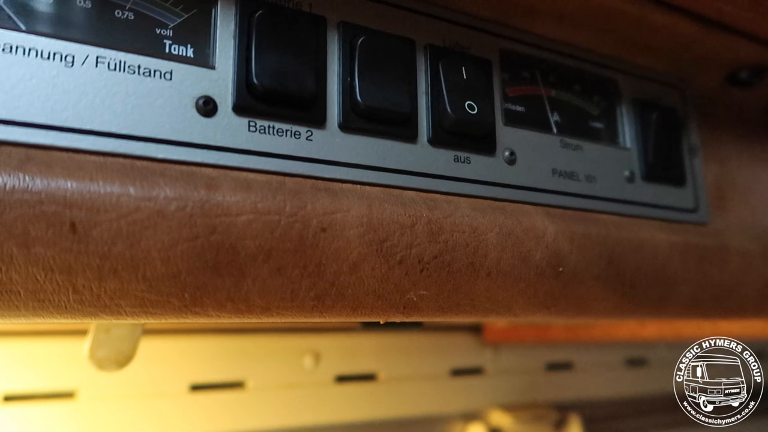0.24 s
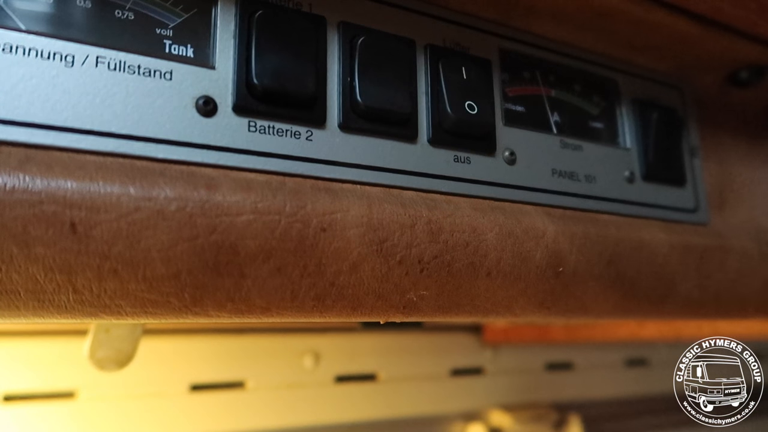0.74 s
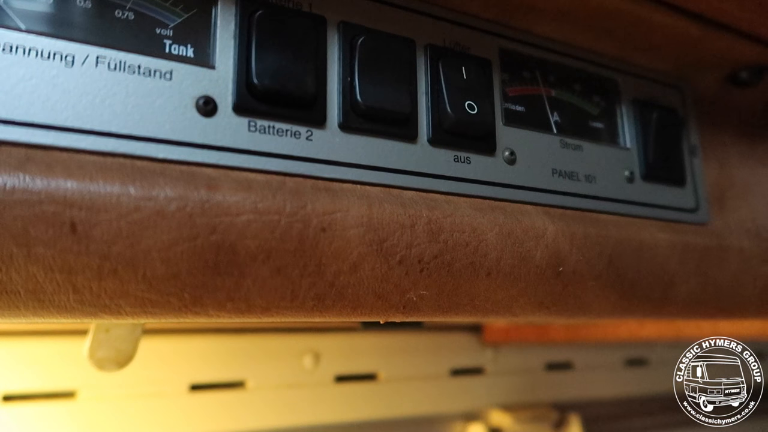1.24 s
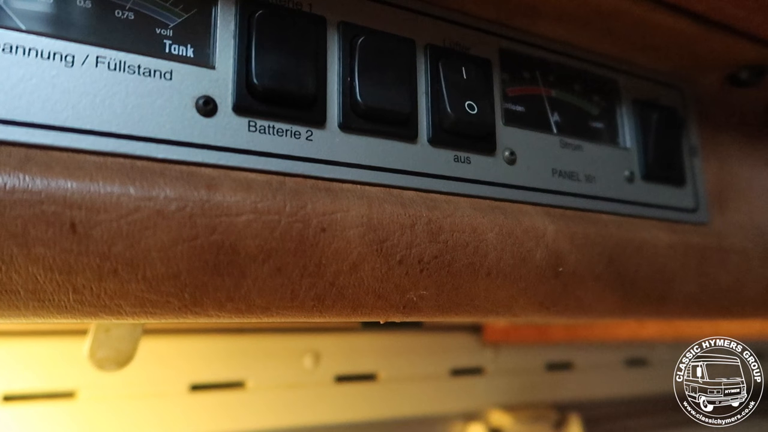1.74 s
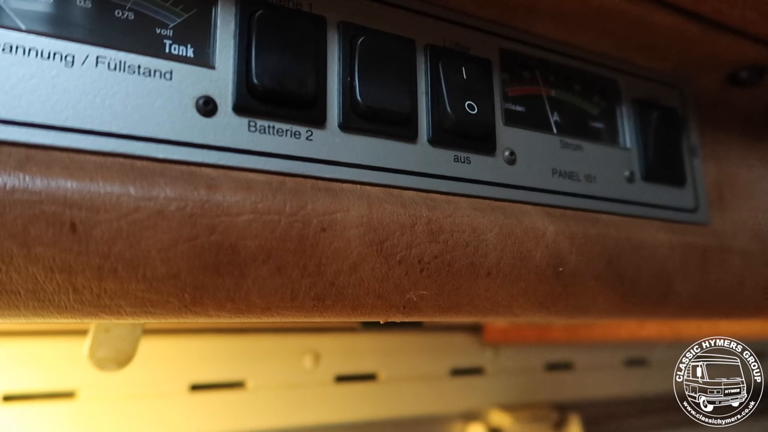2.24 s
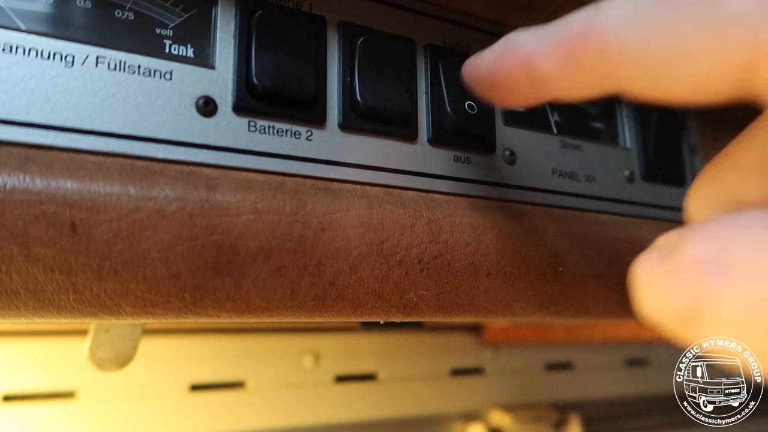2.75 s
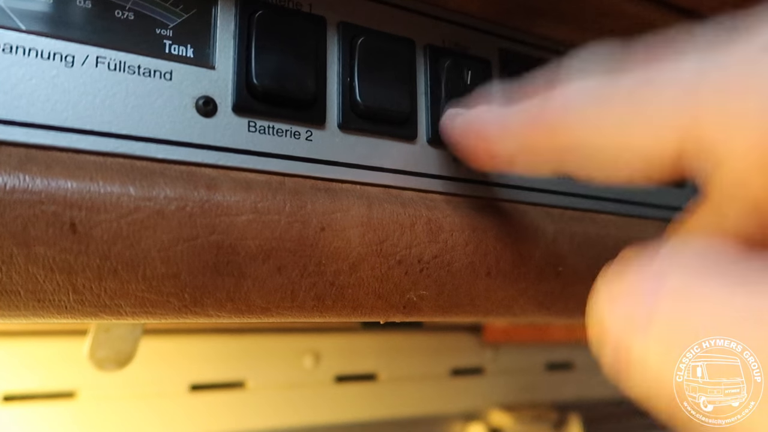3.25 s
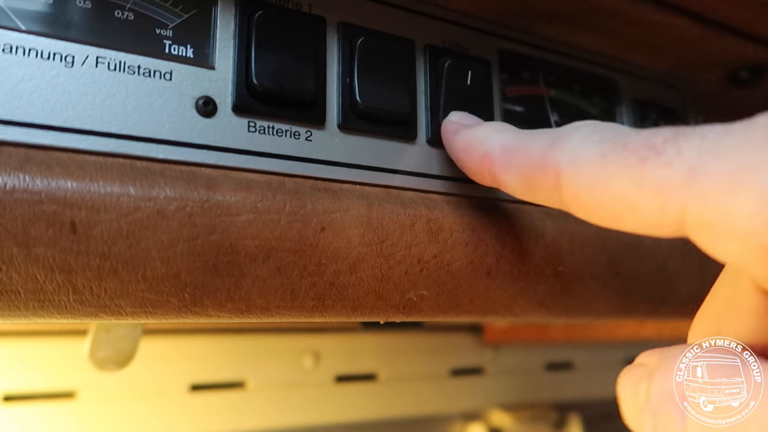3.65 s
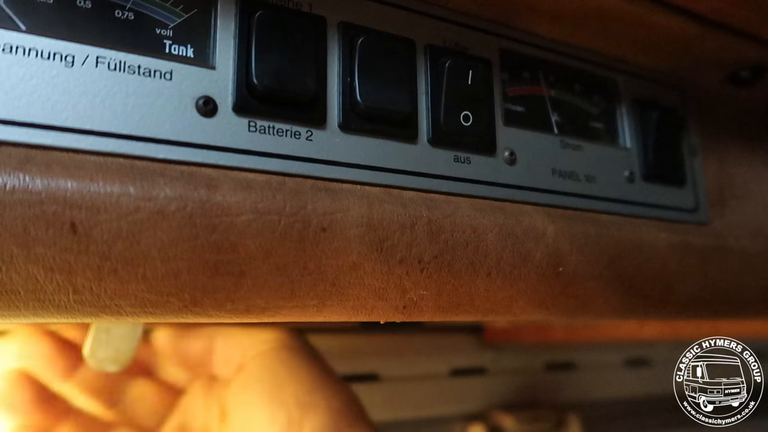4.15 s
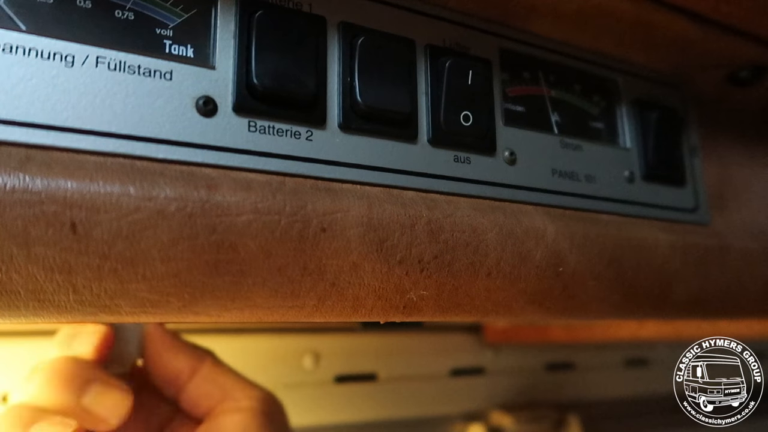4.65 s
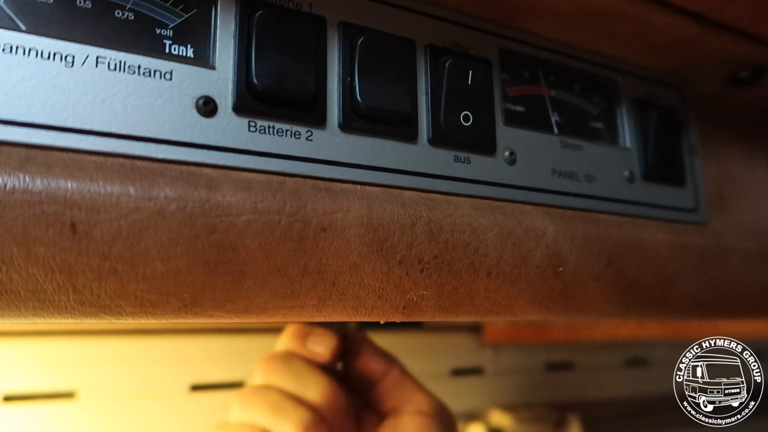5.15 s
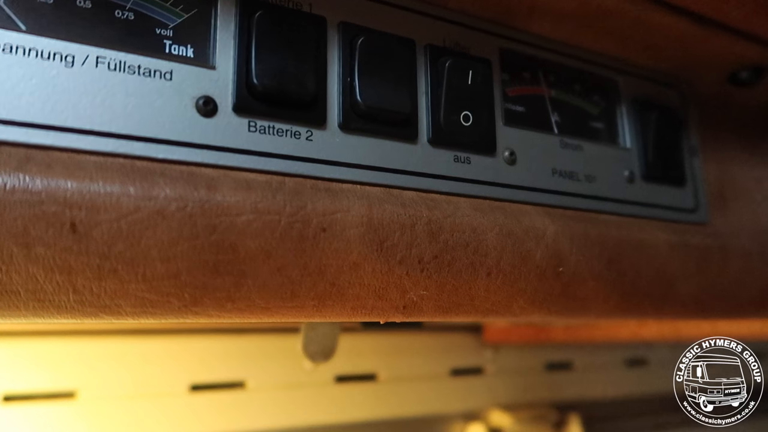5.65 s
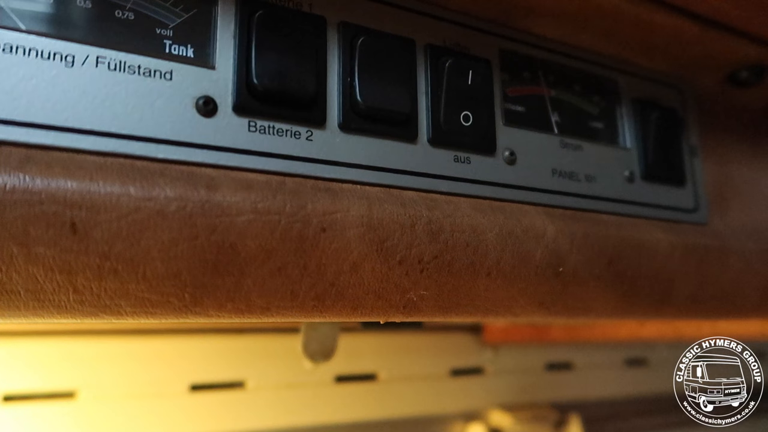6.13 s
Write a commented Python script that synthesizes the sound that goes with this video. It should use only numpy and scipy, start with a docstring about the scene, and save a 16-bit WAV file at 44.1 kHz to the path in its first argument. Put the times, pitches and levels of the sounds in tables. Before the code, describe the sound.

A small fan runs with an even, airy hum in a camper cabin until a nearby switch snaps loudly and the hum sinks in pitch and dies away. After a soft release click, fingers rub and tap a plastic vent tab, drag it with a short scrape and hit the end stop with a knock. A few small ticks follow. The sound is close and dry, with faint rumble and hiss underneath.

```python
"""Extractor fan and vent slider in a caravan

A small fan hums, with tones at multiples of its shaft speed over turbulent air, until a finger snaps
a rocker switch and the rotor coasts down. The finger peels off the switch. A hand takes the tab of a
plastic vent slider, drags it to the end stop and lets go: impacts ring the modes of the plastic,
friction scrapes and squeaks. A low cabin rumble, a thin hum and a faint hiss lie below."""
import sys
import numpy as np
from scipy import signal
from scipy.fft import rfft, irfft
from scipy.io import wavfile

SR = 44100
rng = np.random.default_rng(int(sys.argv[2]) if len(sys.argv) > 2 else 0)


def master(y):
    """Save y as 16-bit WAV."""
    cut = np.clip(np.atleast_2d(y).T, -1, 1)
    pcm = np.round(cut * 32767)  # scale
    wavfile.write(sys.argv[1], SR, pcm.astype(np.int16))


N = 281799
TIME = np.arange(N) / SR
HZ = np.maximum(np.fft.rfftfreq(N, 1 / SR), 1)

# Stereo width of the fan. Each row: frequency in Hz, side minus mid in dB.
FAN_WIDTH = [(60, -58), (110, -59), (200, -31.5), (380, -21), (700, -42), (1290, -18.5), (2380, -17.5),
             (4390, -5), (8100, -1), (15000, 16)]
# Stereo width of nearby sources, before any trim. Each row: frequency in Hz, side minus mid in dB.
NEAR_WIDTH = [(60, -53.5), (130, -33), (290, -24.5), (640, -25), (1410, -17.5), (3090, -11.5), (6800, -0.5),
              (15000, 5.5)]


def amp(db):
    """Amplitude ratio: a factor of ten for every 20 dB."""
    return 10 ** (np.asarray(db) / 20)


def unit_rms(x):
    """Normalisation to unit mean power."""
    return x / np.sqrt(np.mean(x ** 2) + 1e-20)


def spectrum_db(points):
    """Spectral envelope: (Hz, dB) points interpolated over log frequency at every bin."""
    hz, db = np.transpose(points)
    return np.interp(np.log(HZ), np.log(hz), db)


def resonance(hz, width_hz, at_hz=HZ):
    """Magnitude response of a damped resonator, 1 at its centre, with the given half-power width."""
    return 1 / np.sqrt(1 + (2 * (at_hz - hz) / width_hz) ** 2)


def peaks_db(rows):
    """Lorentzian peaks and dips, summed in dB at every bin."""
    return sum(db * resonance(hz, width) ** 2 for hz, width, db in rows)


def drift(rate):
    """Low-pass random fluctuation of unit spread, changing about rate times a second."""
    step, settle = 40, 2000
    pole = np.exp(-2 * np.pi * rate * step / SR)
    noise = rng.standard_normal(N // step + settle + 2)
    slow = signal.lfilter([1], [1, -2 * pole, pole ** 2], noise)[settle:]
    return np.interp(np.arange(N) / step, np.arange(len(slow)), unit_rms(slow))


def swell_db(start, rise_s, hold_s, fade_s):
    """Exponential envelope in dB: gains 20 per rise_s up to 0 at start, holds, loses 20 per fade_s."""
    rising = (start - TIME) / rise_s
    fading = (TIME - start - hold_s) / fade_s
    return -20 * np.maximum(np.maximum(rising, fading), 0)


def stereo_noise(colour_db, width):
    """Partly coherent noise of unit rms: independent mid and side signals share one colour."""
    mid, side = rfft(rng.standard_normal((2, N)))
    side = amp(spectrum_db(width)) * side * [[1], [-1]]
    return unit_rms(irfft(amp(colour_db) * (mid + side), N))


def spread(x, width, trim_db=0, lag_s=.0006):
    """Mid-side stereo: a delayed, filtered copy adds on the left and subtracts on the right."""
    delay = np.exp(-2j * np.pi * HZ * lag_s)
    side = irfft(rfft(x) * delay * amp(spectrum_db(width) + trim_db), N)
    return x + side * [[1], [-1]]


def air_stream(colour_db, halvings, drive_lost):
    """Turbulence noise filtered by the housing; each halving of speed leaves it weaker and duller."""
    db_per_halving, treble_db_per_halving, treble_hz = -27, -12.5, 1300
    air = stereo_noise(colour_db, FAN_WIDTH)
    duct_band = irfft(rfft(air) * resonance(890, width_hz=140) ** 2, N)
    air = air + (amp(2 * drift(rate=3)) - 1) * duct_band   # one duct resonance swells unevenly
    bass = signal.sosfiltfilt(signal.butter(2, treble_hz, fs=SR, output="sos"), air)
    treble_db = treble_db_per_halving * halvings - drive_lost
    level_db = -32 - 5.5 * drive_lost + db_per_halving * halvings + .27 * drift(rate=.73)
    return amp(level_db) * (bass + amp(treble_db) * (air - bass))


def rotor_tones(colour_db, turns_per_s, coasting_s, drive_lost):
    """Harmonics of the shaft rate glide down with it, swelling as they cross fixed resonances."""
    # Every fourth order is a blade-rate harmonic. Each row: multiple of the shaft rate, level in dB.
    orders = [(1, -41), (2, -64.5), (3, -66), (4, -39.5), (5, -53.5), (6, -53), (7, -62.5), (8, -42.5),
              (9, -63), (10, -61), (12, -37.5), (13, -71), (15, -64), (16, -52), (20, -56), (23, -71),
              (32, -63.5), (34, -60), (38, -67.5), (51, -67.5), (52, -68.5), (54, -70), (55, -71),
              (58, -77), (60, -79.5), (83, -67.5), (89, -83)]
    # Orders that outlast the motor current. Each entry: multiple, level change in dB when coasting.
    coasting_db = {5: -6, 6: -8, 7: 2, 8: -5, 9: 11, 10: 13, 12: -12, 13: 14, 15: 8, 16: -3}
    driven_drop_db = -18   # all other orders
    fade_below_turns_per_s, fade_db_per_turn_per_s = 42.7, 8
    unsteady = 1 + .0008 * drift(rate=5) + .012 * (coasting_s > 0) * drift(rate=40)
    shaft_angle = 2 * np.pi * np.cumsum(turns_per_s * unsteady) / SR
    waver_db = [1.3 * drift(rate=5) for _ in range(4)]
    flicker_db = [4 * drift(rate=22) for _ in range(6)]
    phases = rng.uniform(0, 2 * np.pi, len(orders))
    unpowered = np.clip(coasting_s / .024, 0, 1)
    tones = np.zeros(N)
    for i, (order, db) in enumerate(orders):
        hz = order * turns_per_s
        housing_db = .3 * (np.interp(hz, HZ, colour_db) - np.interp(hz[0], HZ, colour_db))
        panel_db = 14 * resonance(375, width_hz=100, at_hz=hz) ** 2
        change_db = flicker_db[i % 6] + housing_db + panel_db + coasting_db.get(order, driven_drop_db)
        level_db = db + waver_db[i % 4] + unpowered * change_db
        tones += amp(level_db) * np.sin(order * shaft_angle + phases[i])
    slow_loss_db = fade_db_per_turn_per_s * np.maximum(fade_below_turns_per_s - turns_per_s, 0)
    return spread(np.sqrt(2) * amp(-15 * drive_lost - slow_loss_db) * tones, FAN_WIDTH)


def fan():
    """A rotor radiates broadband noise and tones; without power its speed decays exponentially."""
    # Spectrum of the air stream. Each row: frequency in Hz, relative level in dB.
    turbulence = [(12, -38.5), (20, -12), (80, -4.5), (290, -2), (400, -7.5), (1000, -7), (1300, -13.5),
                  (2000, -14.5), (5000, -31), (10700, -38.5), (12800, -48), (14500, -69)]
    # Housing and duct resonances, and the gaps between. Each row: centre in Hz, width in Hz, gain in dB.
    housing = [(90, 47, 7), (151, 60, 6), (489.4, 63, 10.5), (646, 90, 8), (797.5, 15, 5.5), (870, 71, 9),
               (996, 390, 5.5), (1394, 80, 10.5), (1557, 130, 7), (2319, 200, 11), (2335, 16, 9.5),
               (3090, 120, 10), (2670, 150, 9), (3380, 88, 5.5), (3705, 260, 11), (3948, 63, 9),
               (4250, 60, 10.5), (4590, 68, 10.5), (4895, 270, 8.5), (6000, 56, 1.5), (5780, 140, 8),
               (6930, 100, 7), (7465, 140, 6)]
    gaps = [(195, 25, -4), (310, 40, -5), (390, 50, -6), (550, 40, -4), (725, 40, -7), (1260, 60, -10),
            (1645, 30, -6), (1870, 50, -7), (2210, 50, -9), (2470, 60, -3), (3070, 50, -8), (3520, 90, -7),
            (3850, 70, -5), (4180, 80, -4), (5360, 60, -4)]
    running_turns_per_s, power_off_s, coast_decay_s = 84.45, 3.315, .59
    coasting_s = np.maximum(TIME - power_off_s, 0)
    turns_per_s = running_turns_per_s * np.exp(-coasting_s / coast_decay_s)
    halvings = np.log2(running_turns_per_s / turns_per_s)
    drive_lost = 1 - np.exp(-coasting_s / .028)
    colour_db = spectrum_db(turbulence) + peaks_db(housing + gaps)
    air = air_stream(colour_db, halvings, drive_lost)
    return air + rotor_tones(colour_db, turns_per_s, coasting_s, drive_lost)


def cabin():
    """Ambient noise floor: a shifting rumble, a pure hum that dies away late, and a steady hiss."""
    # Course of the rumble. Each row: time in seconds, level in dB.
    rumble_course = [(3.3, -51.5), (3.9, -49), (4.3, -43.5), (4.7, -43.5), (5.3, -44), (5.7, -48.5),
                     (6.39, -47)]
    # Spectrum of the rumble. Each row: frequency in Hz, relative level in dB.
    rumble_spectrum = [(12, -37), (20, -13), (59, -0.5), (140, -7), (220, -7), (280, -4), (350, -16.5),
                       (410, -12), (500, -19.5), (800, -30), (1500, -58)]
    # Two faint hums in the rumble and a gap above them. Each row: centre in Hz, width in Hz, gain in dB.
    rumble_peaks = [(217.5, 20, 4), (283, 16, 5), (315, 24, -8)]
    # Stereo width of the cabin noise. Each row: frequency in Hz, side minus mid in dB.
    width = [(25, -55.5), (60, -41.5), (150, -26), (380, -7.5), (950, -2.5), (2380, -1), (5960, -1),
             (15000, 4)]
    hum_hz, hum_ends_s, hiss_db = 219.3, 5.2, -57.5
    rumble_db = np.interp(TIME, *np.transpose(rumble_course)) + .6 * drift(rate=5)
    rumble = amp(rumble_db) * stereo_noise(spectrum_db(rumble_spectrum) + peaks_db(rumble_peaks), width)
    hum_db = -56.5 + swell_db(0, 1, hold_s=hum_ends_s, fade_s=.3) + 2 * drift(rate=3)
    hum = amp(hum_db) * np.sqrt(2) * np.sin(2 * np.pi * hum_hz * TIME)
    hiss_colour = spectrum_db([(200, -3.5), (600, -1.5), (1500, -6), (2500, -10), (6000, -17.5),
                               (11700, -28), (15400, -36)])
    return rumble + hum + amp(hiss_db) * stereo_noise(hiss_colour, width)


def strike(contacts, modes, trim_db, crack_db, rise_s):
    """Modal impact: each contact excites damped sinusoids and a noise crack, low-passed at its cutoff."""
    out = np.zeros(N)
    t = TIME[:SR // 4]
    scatter_db = rng.normal(0, 2, (len(contacts), len(modes)))
    noise = signal.lfilter([1, -1], [1, -.9], rng.standard_normal((len(contacts), len(t))))
    cracks = noise * amp(crack_db - 60 * t / .006)
    attack = 1 - np.exp(-t / rise_s)
    for (start, db, cutoff_hz), mode_db, crack in zip(contacts, scatter_db, cracks):
        # neighbouring modes start in opposite directions
        ring = sum((-1) ** k * amp(level + mode_db[k] - 60 * t / t60) * np.sin(2 * np.pi * hz * t)
                   for k, (hz, level, t60) in enumerate(modes))
        impact = signal.lfilter(*signal.butter(2, cutoff_hz, fs=SR), (ring + crack) * attack)
        i = round(start * SR)
        out[i:i + len(t)] += (amp(db + trim_db) * impact)[:N - i]
    return out


def fading_clicks(start, length_s, first_db, cutoff_hz, loss_db=12, count=20):
    """Jittered impulse train: rows for strike that give a brief, fading burst of tiny clicks."""
    progress = (np.arange(count) + rng.random(count)) / count
    levels_db = first_db - loss_db * progress + rng.normal(0, 2, count)
    return [(s, db, cutoff_hz) for s, db in zip(start + length_s * progress, levels_db)]


def rocker_switch():
    """Impulsive excitation: the snap, then the departing fingertip, ring the switch and its panel."""
    # Contacts of the snap and of the fingertip peeling off.
    # Each row: start in seconds, relative level in dB, cutoff in Hz.
    snap_contacts = [(3.3058, -23.5, 2430), (3.3068, -17, 5000), (3.3075, -13.5, 6840), (3.3082, 3.5, 5500),
                     (3.3090, -3.5, 3500), (3.3133, -16.5, 5000), (3.3175, -24.5, 3000),
                     (3.3225, -29, 9000)]
    release_contacts = [(3.7872, -24, 1280), (3.8075, -33, 1500), (3.8100, -38, 2500), (3.8135, -38, 3500),
                        (3.8155, -29.5, 3000), (3.8190, -44, 2000)]
    # Modes of switch and panel. Each row: frequency in Hz, relative level in dB, T60 in seconds.
    modes = [(97.9, -25, 0.12), (119, -14.5, 0.06), (246, -28.5, 0.029), (400, -23.5, 0.03),
             (505, -7, 0.034), (620, -14, 0.03), (730, -16, 0.025), (880, -18.5, 0.067), (982, -10, 0.015),
             (1200, -13, 0.011), (1770, -6.5, 0.008), (2150, 5, 0.006), (2440, -5.5, 0.015),
             (2720, 0.5, 0.0051), (3140, -3.5, .012), (3580, -4, 0.01), (4200, -11.5, 0.006),
             (5250, -17, 0.016), (6200, -8, 0.0092), (7700, -20.5, 0.011), (9000, -22, .007),
             (11660, -24, 0.016), (13000, -18.5, .005), (14600, -3.5, .012)]
    # a brief, bright, fading fizz just after the snap
    snap_fizz = fading_clicks(3.311, length_s=.021, first_db=-30, cutoff_hz=12000)
    snap = strike(snap_contacts + snap_fizz, modes, trim_db=-3.5, crack_db=9.5, rise_s=.0001)
    return snap + strike(release_contacts, modes, trim_db=-5, crack_db=15.5, rise_s=.00093)


def rubbing():
    """Sliding friction: dense small slips excite the rail resonances, with hood rumble and skin hiss."""
    # Resonances of the rail. Each row: centre in Hz, width in Hz, relative level in dB.
    rail = [(876, 240, 1), (1400, 160, -2.5), (1636, 22, 2.5), (1900, 50, -1), (2420, 160, -6),
            (2830, 120, -1.5), (3700, 380, -11), (4970, 270, -28), (6470, 350, -24)]
    # Strokes on tab and rail. Each row: time of full level, rise, hold and fade in seconds,
    # scrape level in dB, then rumble and hiss in dB relative to the scrape.
    strokes = [(4.156, .03, 0.043, .06, -68, -7, 4), (4.26, 0.12, .005, 0.2, -51, 6, -13.5),
               (4.413, 0.053, 0.0056, 0.072, -47.5, 11, -15.5), (4.83, 0.03, 0.053, .1, -62.5, 11, -33),
               (4.924, 0.091, 0.048, 0.17, -38, -1.5, -39), (4.988, 0.23, 0.06, 0.13, -42, -20, -12),
               (5.068, 0.022, 0.022, 0.7, -36.5, -2, -28), (5.436, 0.0036, .004, 0.04, -54, 3, -29),
               (5.46, 0.0065, 0.05, .02, -61, -5, 1.5), (5.501, 0.053, .004, 0.042, -51.5, 13.5, -25)]
    brightening_s, end_stop_s, tilt_db_per_octave_s = 4.52, 5.146, 10
    slip_spread_db, scrape_top_hz, skin_top_hz = 3, 6000, 12700
    noise = rng.standard_normal((3, N))
    slip_sizes = amp(slip_spread_db * np.minimum(rng.exponential(1, N), 4))
    rail_slips, hood_slips, skin_slips = rfft(noise * slip_sizes)
    rail_slips = rail_slips / (1 + (HZ / scrape_top_hz) ** 2)
    # the first touches sound duller; the drag and later touches sound brighter
    tilt_db = tilt_db_per_octave_s * np.clip(TIME - brightening_s, -.15, .15)
    scrape = np.zeros(N)
    for hz, width, db in rail:
        catching_db = 4 * drift(rate=15)   # each resonance catches and lets go on its own
        band = irfft(rail_slips * resonance(hz, width), N)
        scrape += amp(db + tilt_db * np.log2(hz / 2000) + catching_db) * band
    scrape = unit_rms(scrape)
    rumble = unit_rms(irfft(hood_slips * resonance(380, width_hz=350) ** 2, N))
    skin_band = resonance(5600, width_hz=11500) ** 2 / (1 + (HZ / skin_top_hz) ** 8)
    hiss = unit_rms(irfft(skin_slips * skin_band, N))
    stop_db = swell_db(0, 1, hold_s=end_stop_s, fade_s=.006)   # the end stop cuts off earlier strokes
    out = np.zeros(N)
    for start, rise_s, hold_s, fade_s, db, rumble_db, hiss_db in strokes:
        level_db = db + swell_db(start, rise_s, hold_s, fade_s) + stop_db * (start < end_stop_s)
        out += amp(level_db) * (scrape + amp(rumble_db) * rumble + amp(hiss_db) * hiss)
    return out * amp(.8 * drift(rate=30))


def fingertip_squeaks():
    """Stick-slip oscillation of skin on the tab gives a narrow band of noise around each pitch."""
    # Each row: time of full level in seconds, hold in seconds, pitch in Hz, level in dB.
    squeaks = [(4.166, 0.024, 2880, -55), (4.225, .03, 2870, -63), (4.3, 0.047, 2890, -63),
               (4.4, 0.0093, 3430, -53), (5.496, 0.012, 1700, -49.5), (5.498, 0.011, 2380, -59)]
    half_width_hz = 130
    lowpass = signal.butter(2, half_width_hz, fs=SR, output="sos")
    in_phase, quadrature = signal.sosfilt(lowpass, rng.standard_normal((2, N)))
    out = np.zeros(N)
    for start, hold_s, hz, db in squeaks:
        phase = 2 * np.pi * hz * TIME
        band = unit_rms(in_phase * np.cos(phase) + quadrature * np.sin(phase))
        out += amp(db + swell_db(start, rise_s=.02, hold_s=hold_s, fade_s=.022)) * band
    return out


def slider_knocks():
    """Impacts ring the modes of slider and hood; the hardest, at the end stop, leaves a rattle."""
    # Each row: start in seconds, relative level in dB, cutoff in Hz.
    knocks = [(4.262, -42, 790), (4.428, -31, 999), (5.1465, -17, 5000), (5.148, -13, 2980),
              (5.1505, -19, 3500), (5.160, -21, 1210), (5.4345, -38, 3000), (6.126, -38, 500)]
    # Modes of slider and hood. Each row: frequency in Hz, relative level in dB, T60 in seconds.
    modes = [(107, -20, 0.12), (159, -8, 0.07), (236, -5, 0.059), (354, -9, 0.078), (442.4, -0.5, 0.032),
             (528, -2.5, 0.016), (853, -11, 0.038), (1000, -11.5, 0.056), (1318, -15, 0.039),
             (1535, -15, 0.016), (1750, -19, 0.017), (1970, -22, 0.025), (2370, -8, 0.015),
             (3540, -20, 0.02), (3930, -21, 0.016), (4930, -20, 0.016), (6400, -12, 0.012),
             (8600, -42, .01)]
    stop_rattle = fading_clicks(5.149, length_s=.024, first_db=-28, cutoff_hz=5000)
    return strike(knocks + stop_rattle, modes, trim_db=1, crack_db=-2, rise_s=.00059)


def fingernail_ticks():
    """Light impacts of a fingernail set the tab into brief, damped free vibration."""
    # Each row: start in seconds, relative level in dB, cutoff in Hz.
    ticks = [(4.272, -30, 5000), (4.278, -31, 4000), (4.410, -30.5, 6000), (4.417, -25, 4920),
             (5.078, -23, 3000), (5.500, -31, 3000), (5.508, -29, 3000)]
    # Modes of the tab. Each row: frequency in Hz, relative level in dB, T60 in seconds.
    modes = [(890, 7, 0.029), (1650, -16, 0.027), (2100, -1.5, 0.04), (2500, -3.5, 0.031),
             (2800, -7, 0.021), (3400, 0, 0.02)]
    return strike(ticks, modes, trim_db=-12.5, crack_db=7, rise_s=.00092)


def cabin_reverberation(x):
    """Diffuse field of a small padded cabin: a short tail, wider and sooner absorbed in the treble."""
    # Colour of the tail. Each row: frequency in Hz, gain in dB.
    colour = [(100, -29), (500, -8), (2000, -11), (6000, -9), (15000, -8)]
    # Decay of the three bands. Each row: nominal frequency in Hz, T60 in seconds.
    decays = [(300, .1), (1500, .06), (6000, .05)]
    edges_hz, first_return_s, wider_db = [60, 700, 3000, 16000], .0048, 10
    t = TIME[:SR // 5]
    tail = np.zeros((2, len(t)))
    for low, high, (_, t60) in zip(edges_hz, edges_hz[1:], decays):
        bandpass = signal.butter(2, [low, high], "band", fs=SR, output="sos")
        band = signal.sosfilt(bandpass, rng.standard_normal(tail.shape))
        decay = amp(-60 * t / t60) / np.sqrt(t60 * SR / 14)   # about unit energy
        tail += band * decay * (t > first_return_s)
    mid, side = rfft(tail, N)
    side = side * np.minimum(amp(spectrum_db(NEAR_WIDTH) + wider_db), 2)
    return irfft(rfft(x) * amp(spectrum_db(colour)) * (mid + side * [[1], [-1]]), N)


def scene():
    """Superposition of the fan, the direct and reverberant sound of switch and slider, and the cabin."""
    switch = rocker_switch()
    slider = slider_knocks() + fingernail_ticks() + rubbing() + fingertip_squeaks()
    # the switch lies nearer the microphone axis, so its image is narrower
    direct = spread(switch, NEAR_WIDTH, trim_db=-10.5) + spread(slider, NEAR_WIDTH)
    return fan() + direct + cabin_reverberation(switch + slider) + cabin()


def record(dry):
    """Overload and band limiting: the snap clips at full scale, and a steep low-pass cuts the top."""
    stopband_hz = 15500
    lowpass = signal.cheby2(24, 80, stopband_hz, fs=SR, output="sos")
    return signal.sosfilt(lowpass, np.clip(dry, -1, 1))


dry = scene()
out = record(dry)
master(out)
```